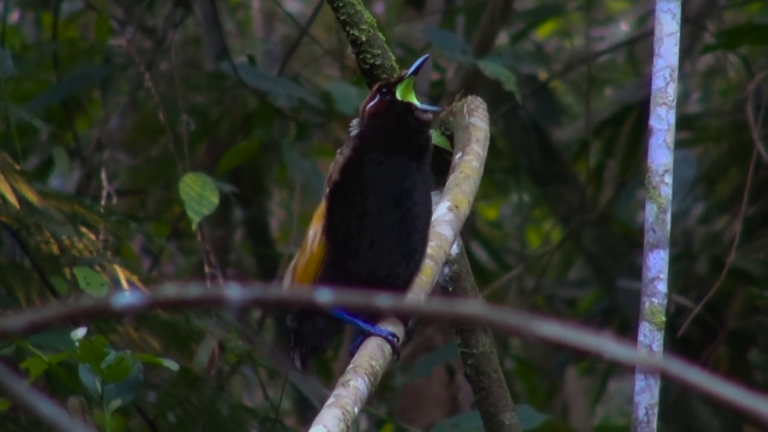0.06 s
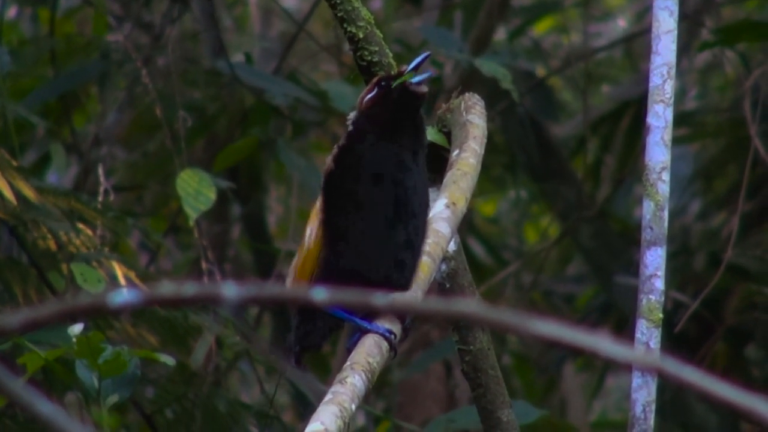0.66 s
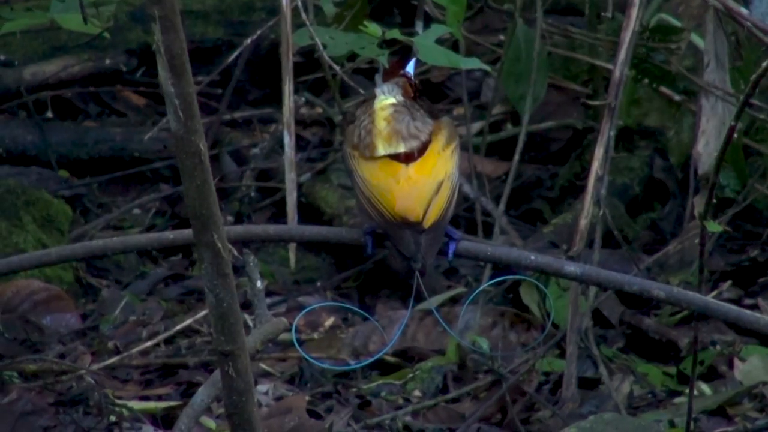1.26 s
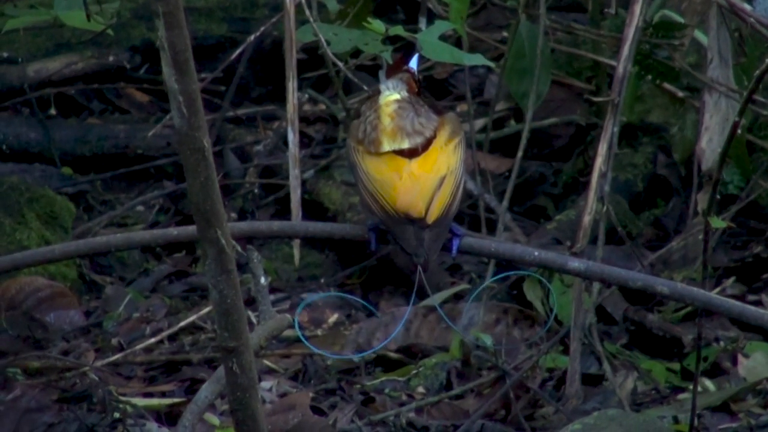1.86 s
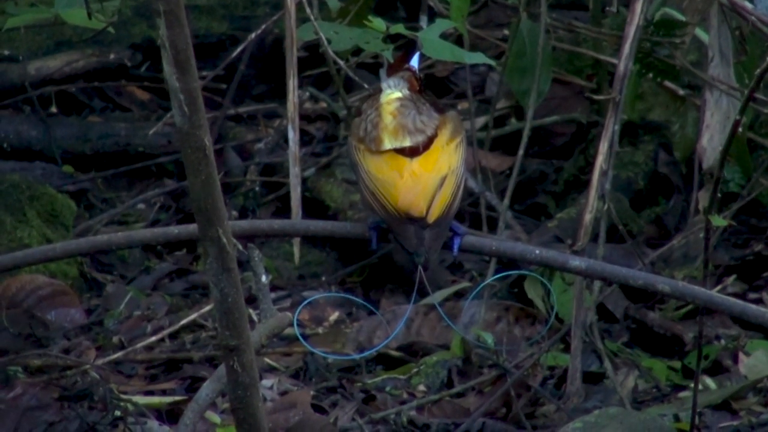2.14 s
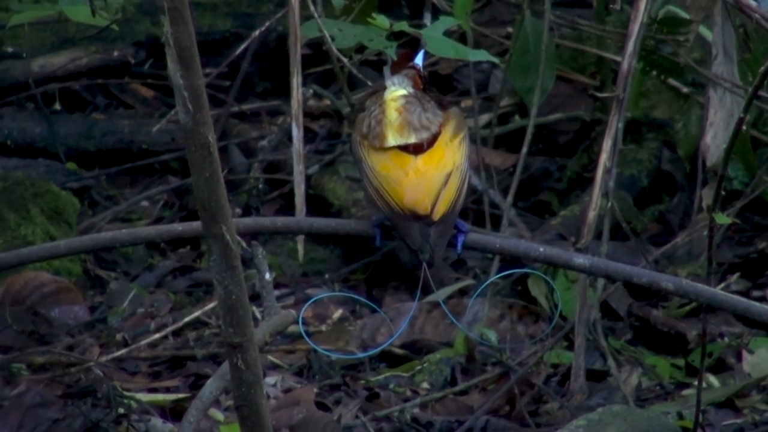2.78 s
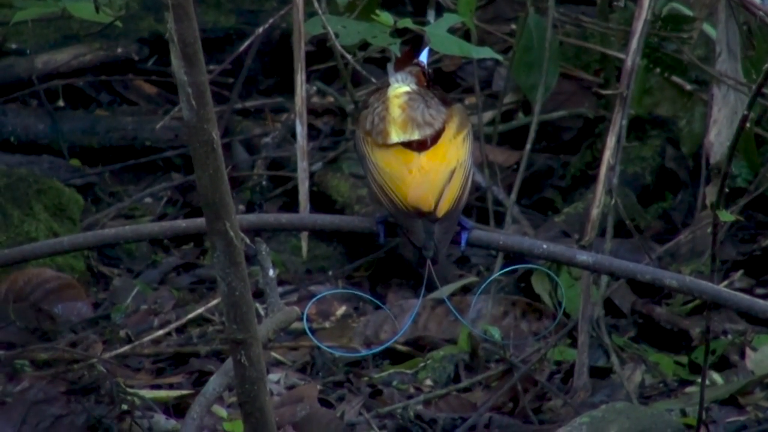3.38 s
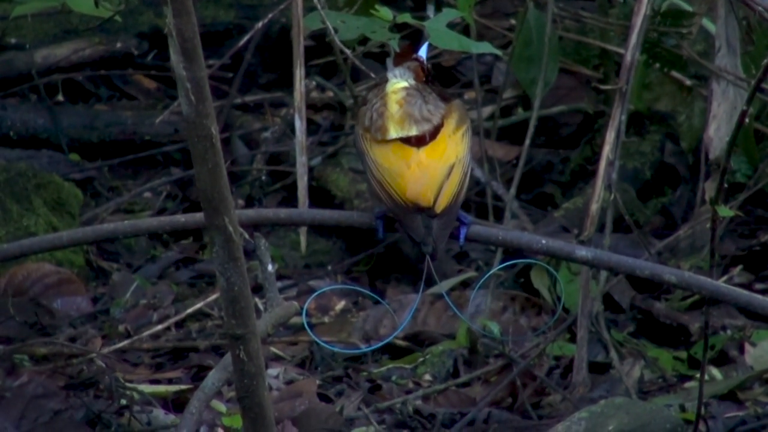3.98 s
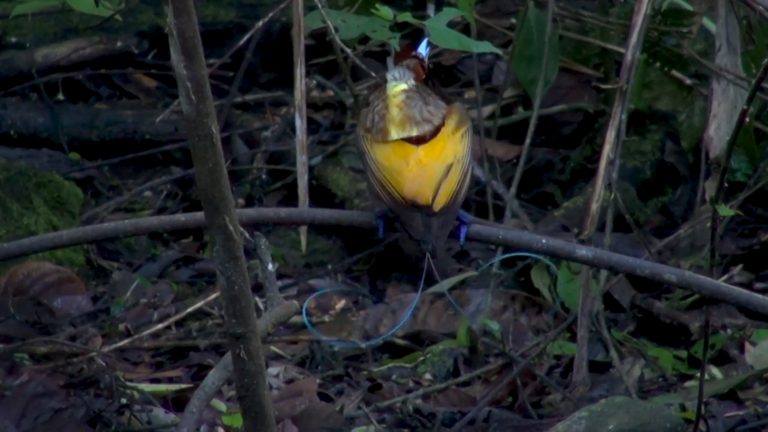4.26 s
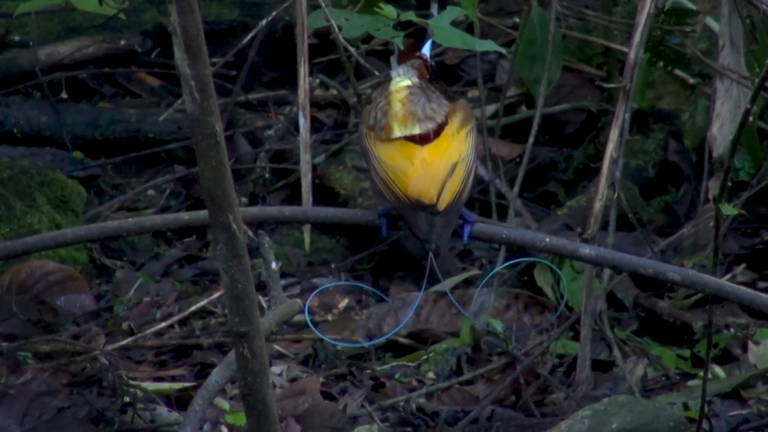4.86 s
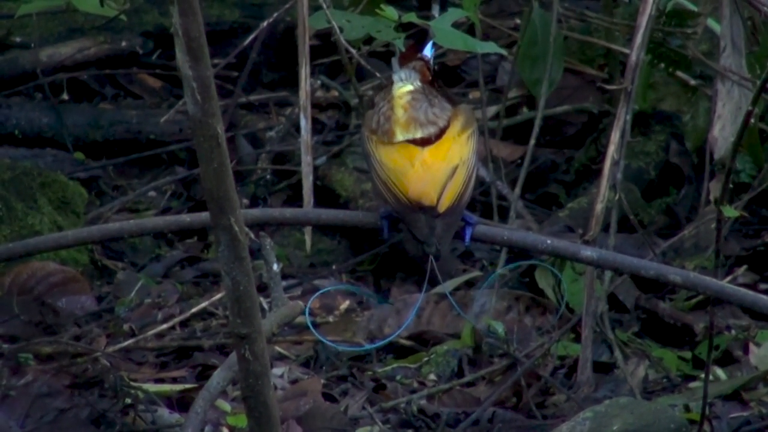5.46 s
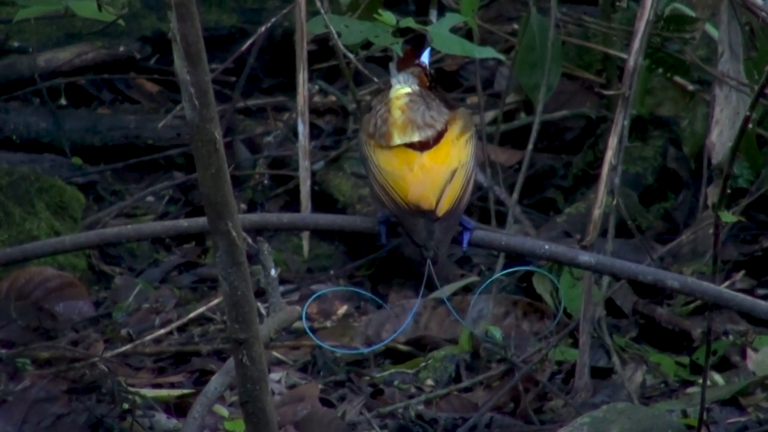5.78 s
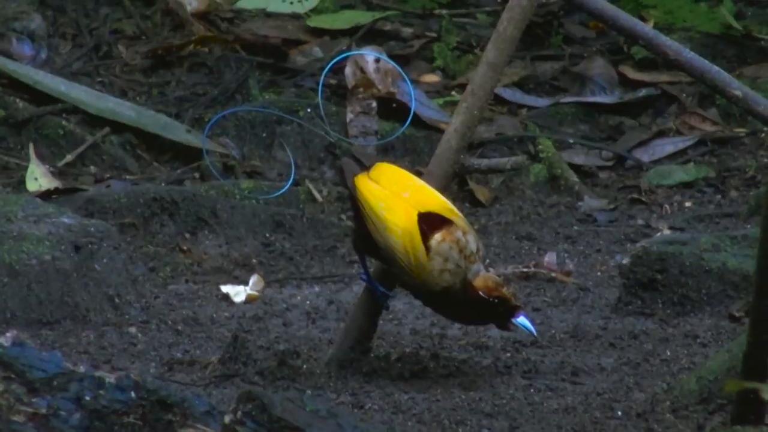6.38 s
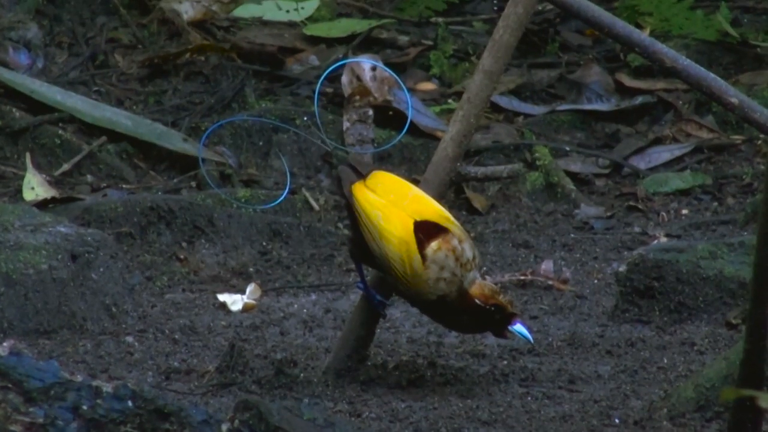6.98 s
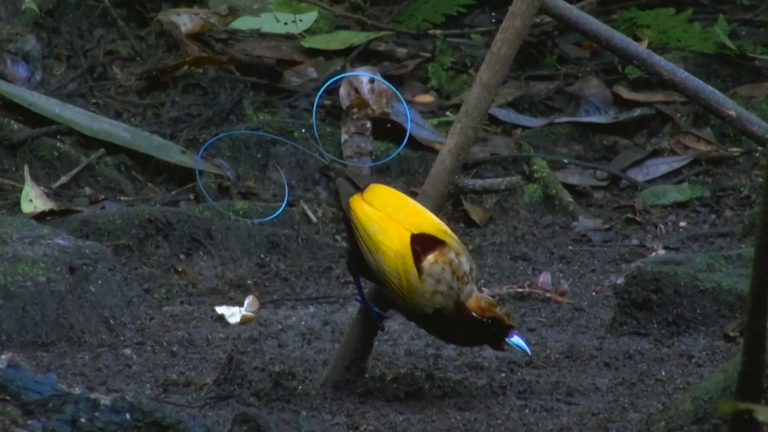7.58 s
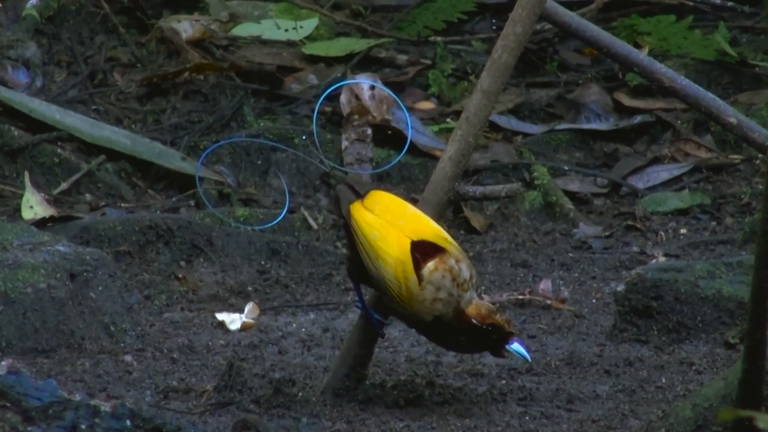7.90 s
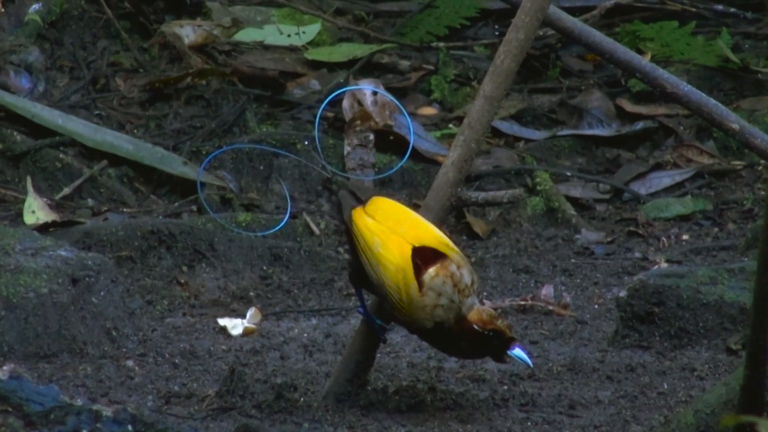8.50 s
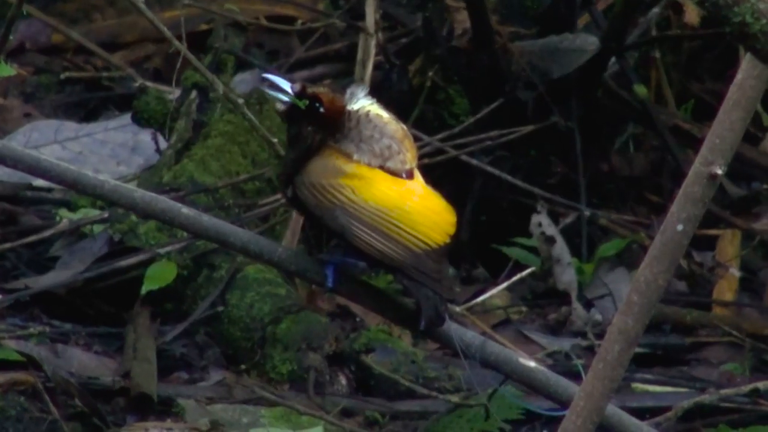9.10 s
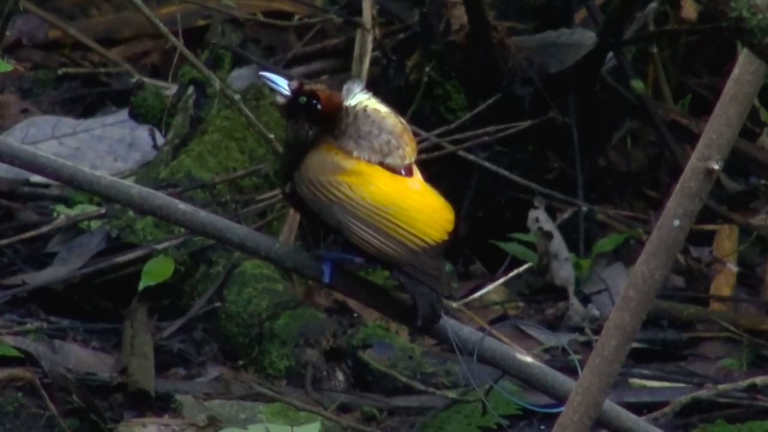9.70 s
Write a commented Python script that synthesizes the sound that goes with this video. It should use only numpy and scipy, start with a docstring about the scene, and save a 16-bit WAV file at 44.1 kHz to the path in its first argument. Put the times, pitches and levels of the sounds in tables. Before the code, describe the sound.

Raspy bird calls and then piercing downward notes echo among trees, with soft whining insects and a twig snapping.

```python
"""A bird of paradise calls in a rain forest: three harsh, warbling, falling churrs, which with their echo stop
dead on a click at 0.95 s, then five sharp down-slurred notes, each trailing a thin whistle into the echo of the
trees. Its syrinx makes a stack of harmonics and a rasp of air, which the throat and beak colour. Insects whine
near 4.7 kHz over a soft forest murmur; twigs snap and a far bird answers."""
import sys
import numpy as np
from scipy import signal
from scipy.fft import rfft, irfft, next_fast_len
from scipy.io import wavfile
from scipy.ndimage import map_coordinates

SR = 44100
rng = np.random.default_rng(int(sys.argv[2]) if len(sys.argv) > 2 else 0)


def waveform_to_disk(signal):
    """Save audio, clipped to [-1, 1], as 16-bit WAV at the path in sys.argv[1]."""
    frames = np.transpose(np.atleast_2d(signal))
    scaled = np.clip(frames, -1, 1) * 32767
    samples = np.round(scaled).astype(np.int16)
    wavfile.write(sys.argv[1], SR, samples)


N = 429534
T = np.arange(N) / SR
TOP_HZ = 15750

# The churr cues. Each row: start in seconds, level in dB.
CHURR_CUES = [(0.05, -19), (0.446, -19), (0.848, -18.5)]
# The throat's tone with the beak wide open, then settled. Each row: frequency in Hz, gain in dB.
OPEN_THROAT = [(850, -27.5), (1300, -23.5), (1700, 0), (2200, 0), (2750, -12), (3300, -31), (3900, -39),
               (5500, -42), (6600, -30), (8000, -33.5), (9200, -51.5), (10300, -49.5), (11800, -44.5),
               (13500, -58), (16000, -52)]
SETTLED_THROAT = [(700, -12.5), (1100, -26), (1450, 1.5), (1900, 0), (2350, -11), (2850, -33.5),
                  (3400, -40), (5200, -45), (6400, -33.5), (7400, -37), (8600, -53), (10000, -40.5),
                  (11200, -59.5), (13700, -45.5), (16000, -59.5)]
# Hoarse air in a churr. Each row: frequency in Hz, noise density in dB.
CHURR_AIR = [(1200, -37.5), (1650, -15), (2100, 5), (2600, -2), (3000, -11), (3450, -34.5), (6500, -26.5),
             (9000, -56.5)]
# Where the bright bite of a churr or sharp note sits. Each row: frequency in Hz, share of the bite.
BITE_SHARE = [(3500, 0.043), (5200, 0.69)]


def churrs(length=.256, first_hz=1153, last_hz=829.6, warble_hz=51, swing=.08, rough=.028, throb_db=2.5):
    """A sinking, throbbing rasp: alternate cycles differ only slightly, so even harmonics carry it."""
    attack_s, hold_s, release_s, settle_s = .028, .086, .023, .11
    out = np.zeros((2, N))
    air = rush(CHURR_AIR)[0]
    t = np.arange(int(length * SR)) / SR
    sink = (last_hz / first_hz) ** (t / length)
    throat_shift = (sink / sink.mean()) ** .6  # the resonances sink with the pitch
    gape = np.clip(1 - (t / settle_s) ** 2, 0, 1)
    throat = lambda hz: gape * along(OPEN_THROAT, hz) + (1 - gape) * along(SETTLED_THROAT, hz / throat_shift)
    bite = lambda hz: (4 - 44.5 * t) * along(BITE_SHARE, hz)  # starts bright, then dulls
    envelope = (1 - np.exp(-t / attack_s)) * amp(-58 * np.maximum(t - hold_s, 0))
    envelope *= np.clip((length - t) / release_s, 0, 1)
    for s, db in CHURR_CUES:
        warble = phase_of(warble_hz * (1 + .05 * wobble(40, len(t))))
        pitch = first_hz * sink * (1 + swing * np.cos(warble) + rough * wobble(700, len(t)))
        effort = envelope * amp(db - throb_db * np.sin(warble))  # loudest as the warble slides up
        tone = voice(pitch, lambda hz: throat(hz) + bite(hz), count=18, odd_db=-8.5)
        rasp = amp(-8 - 65 * t) * air[round(s * SR):][:len(t)]
        call = effort * (tone + rasp)
        echoed = among_trees(call, early_db=1.5, early_t60=.09, tail_db=-13.5, width_db=-20)
        place(out, s, echoed, pan_db=-.5)
    # the trees ring faintly in the band of the churr
    ringing = rush([(1200, -58.5), (1600, -4.5), (1900, -2.5), (2300, -8), (3200, -62)])
    return out + amp(-44 - 15 * T) * ringing


# The sharp note cues. Each row: start in seconds, first pitch and landing pitch in Hz, time to the peak
# and fall time in seconds, level in dB, length in seconds, beak resonance in Hz, bite in dB,
# gain of the odd harmonics in dB.
NOTE_CUES = [(1.548, 2392, 1279, 0.029, .02, -15.5, .29, 7100, 8, -7),
             (4.241, 2288, 1257, 0.028, .021, -15.5, .29, 7000, 8, -6.5),
             (5.445, 2143, 1262, 0.036, 0.015, -17, .3, 6550, 7.5, -6.5),
             (5.658, 1838, 1239, 0.027, .014, -21.5, .24, 5050, 0.5, -5.5),
             (8.99, 2246, 1265, 0.0227, .024, -15, .3, 5730, 8.5, -3.5)]
# The throat's tone in the burst, then in the held whistle. Each row: frequency in Hz, gain in dB.
BURST_THROAT = [(1100, -14.5), (1500, -10), (2100, -11), (2500, -3.5), (2900, -2), (3650, -8.5),
                (4100, -20), (5500, -34.5), (6500, -44), (8200, -37), (9200, -47), (10800, -47.5),
                (12600, -39.5), (16000, -52)]
HELD_THROAT = [(1200, -6), (2500, -3), (3800, -46), (5050, -21), (6300, -12), (7700, -23.5), (9000, -43),
               (16000, -64.5)]
# Hiss of air at the height of a note. Each row: frequency in Hz, noise density in dB.
NOTE_AIR = [(1200, -18), (3000, 3.5), (4500, 9), (6000, 0.5), (8200, 11), (9000, -16), (10800, -14),
            (12600, -16.5), (15700, -25)]


def sharp_notes(rise_s=.022, glide_s=.0225, sag=.11, rough=.018, dulling_db_per_s=240.5, whistle_db=-29):
    """The pitch plunges most of an octave and levels off; a thin whistle hangs on and sags at its end."""
    out = np.zeros((2, N))
    air = rush(NOTE_AIR)[0]
    for s, first_hz, landing_hz, peak_s, fall_s, db, length, beak_hz, bite_db, odd_db in NOTE_CUES:
        t = np.arange(int(length * SR)) / SR
        slope_s = np.where(t < peak_s, rise_s, fall_s)
        force = np.exp(-np.abs((t - peak_s) / slope_s) ** 1.244 / 2)
        pitch = landing_hz + (first_hz - landing_hz) * np.exp(-(t / glide_s) ** 1.3)
        pitch *= 1 - sag * (t / length) ** 3.6
        pitch *= 1 + rough * force * wobble(900, len(t))  # full force roughens the tone
        beak = lambda hz: 8 * np.exp(-((hz - beak_hz) / 900) ** 2)
        bite = lambda hz: (bite_db - dulling_db_per_s * t) * along(BITE_SHARE, hz)
        tone = voice(pitch, lambda hz: along(BURST_THROAT, hz) + beak(hz) + bite(hz), 11, odd_db)
        rasp = amp(-31) * force * air[round(s * SR):][:len(t)]
        burst = force * (tone + rasp)
        held = amp(whistle_db - 45 * t) * np.clip(t / peak_s - 1, 0, 1)
        dulling = lambda hz: 60 * t * (hz > 3500)  # the overtones fade first
        whistle = held * voice(pitch, lambda hz: along(HELD_THROAT, hz) + beak(hz) - dulling(hz), 7)
        call = amp(db) * gate(t, 0, length, .01275) * (burst + whistle)
        echoed = among_trees(call, early_db=-1, early_t60=.0924, tail_db=-9.5, width_db=-23)
        place(out, s, echoed, pan_db=1.6 if s > 7 else -.6)
    return out


def voice(pitch, throat_db, count, odd_db=0):
    """Harmonics of the syrinx, each weighted by the throat as it slides through."""
    k = np.arange(1, count + 1)[:, None]
    weights = amp(throat_db(k * pitch) + odd_db * (k % 2)) * (k * pitch < TOP_HZ)
    return np.sqrt(2) * np.sum(weights * np.sin(k * phase_of(pitch)), axis=0)


# The forest's reverb tail. Each row: frequency in Hz, seconds to fade by 60 dB.
TREE_DECAY = [(300, .5), (1400, 0.79), (2800, 0.91), (6000, 0.68), (13000, 0.22)]


def among_trees(call, early_db, early_t60, tail_db, width_db):
    """A call, its quick scatter off ground and near trunks, and the long forest echo; stereo."""
    hz, frame_s, bands = signal.stft(rng.standard_normal((2, SR)), SR, nperseg=256)
    decay = amp(-60 * frame_s / along(TREE_DECAY, hz)[:, None])
    t = np.arange(SR) / SR
    tail = signal.istft(bands * decay, SR, nperseg=256)[1][:, :SR] * np.clip(t / .0067, 0, 1)
    trunks = rng.standard_normal((2, SR)) * (rng.random((2, SR)) < 500 / SR) * amp(-60 * t / early_t60)
    early = amp(early_db) * trunks / np.linalg.norm(trunks[0])
    mid, side = early + amp(tail_db) * tail / np.linalg.norm(tail[0])
    mid[0] += 1  # the direct sound
    side *= amp(width_db)
    return signal.fftconvolve(call[None], np.array([mid + side, mid - side]), axes=1)


# Twigs and dry leaves. Each row: start in seconds, level in dB, seconds to fade by 60 dB.
SNAP_CUES = [(3.913, -47.5, 0.09), (4.3742, -30.5, 0.077), (8.909, -56.5, 0.046), (9.472, -44, 0.018),
             (9.597, -57.5, 0.022)]
# The colour of a snap. Each row: frequency in Hz, noise density in dB.
SNAP_COLOUR = [(150, -32), (700, -10.5), (1150, -0.5), (2000, -1.5), (4000, -2.5), (8000, -14),
               (15000, -20)]


def twigs():
    """Each snap is a quickly dying burst of splintering."""
    force = np.zeros(N)
    t = np.arange(SR // 4) / SR
    for s, db, t60 in SNAP_CUES:
        add(force, s, amp(db - 60 * t / t60) * (1 - np.exp(-t / .001)))
    return force * unit(rush(SNAP_COLOUR).mean(axis=0) * amp(3 * wobble(1500)))


# The answering bird. Each row: start and length in seconds, first and last pitch in Hz, level in dB.
ANSWER_CUES = [(1.326, 0.075, 1947, 1655, -56.5), (2.744, 0.061, 1960, 1810, -54),
               (4.566, .07, 2070, 1710, -54)]


def far_bird():
    """Faint, short downward slurs with two overtones."""
    out = np.zeros((2, N))
    throat = lambda hz: along([(1800, -4), (2700, 7.5), (3600, -10), (5400, -13), (8000, -20)], hz)
    for s, length, first_hz, last_hz, db in ANSWER_CUES:
        t = np.arange(int(length * SR)) / SR
        pitch = last_hz + (first_hz - last_hz) * (1 - t / length) ** 1.75
        call = amp(db) * gate(t, 0, length, .015) * voice(pitch, throat, count=3)
        echoed = among_trees(call, early_db=-1.5, early_t60=.073, tail_db=-10.5, width_db=-27)
        place(out, s, echoed, pan_db=1)
    return out


# Faint tones. Each row: start and length in seconds, pitch in Hz, level in dB, waver as a share of pitch.
TONE_CUES = [(1.217, .34, 2705, -64, 0.0072), (1.75, 0.8, 2560, -68.5, 0.0296),
             (2.871, .3, 2680, -63.5, .08), (7.48, 0.29, 2900, -72, 0.0029)]


def faint_tones():
    """Faint thin tones, and at 2.9 s a blurred, echo-like ring near 2.7 kHz."""
    out = np.zeros(N)
    for s, length, hz, db, waver in TONE_CUES:
        t = np.arange(int(length * SR)) / SR
        pitch = hz * (1 + waver * wobble(300, len(t)))
        level = amp(db + 4.2 * wobble(17, len(t))) * gate(t, 0, length, .049)
        add(out, s, level * np.sin(phase_of(pitch)))
    return out


# Near insects. Each row: start and length in seconds, pitch in Hz, level in dB, swell in dB per second.
INSECT_BOUTS = [(.93, .7, 4720, -56, -7), (2.579, 1.5, 4646, -60.5, -2), (3.655, 0.92, 4790, -59.5, -9.5),
                (5.193, 1.15, 4647, -59.5, 1), (6.298, 1.1, 4720, -61, -5.5),
                (7.741, 2.1, 4647, -59.5, 1.5)]
# One insect's whine. Each row: ratio to its pitch, noise density in dB.
WHINE_COLOUR = [(.85, -53.5), (.93, -23.5), (.975, -11), (1, -1), (1.025, -12), (1.08, -22), (1.25, -44.5)]
# The far chorus. Each row: frequency in Hz, noise density in dB.
CHORUS_COLOUR = [(3900, -36), (4350, -5), (4650, 0.5), (4900, -2.5), (5200, -11), (5900, -31)]


def insects(throb_hz=51.4, throb_db=2.5):
    """A far chorus blurs into one band; near singers join in bouts. All throb together."""
    chorus_db = bed_levels()[-1]
    out = amp(chorus_db) * rush(CHORUS_COLOUR)
    for s, length, hz, db, swell in INSECT_BOUTS:
        level = amp(db + swell * np.clip(T - s, 0, length)) * gate(T, s, s + length, .07)
        out += level * rush([(hz * ratio, gain) for ratio, gain in WHINE_COLOUR])
    throb = np.sin(phase_of(throb_hz * (1 + .02 * wobble(22))))
    return out * unit(amp(throb_db * throb))


# The forest bed's low, middle and high layers. Each row: frequency in Hz, noise density in dB.
RUMBLE_COLOUR = [(20, -22), (40, -10), (66, 0), (110, -1.5), (170, -5), (300, -23), (600, -45)]
MURMUR_COLOUR = [(100, -18.5), (200, -3), (370, 0), (560, -4), (730, -5), (870, -5.5), (1090, -10),
                 (1400, -10), (1900, -14.5), (2500, -19.5), (3500, -45.5)]
LEAF_COLOUR = [(900, -13), (1800, 4.5), (3000, 4), (4000, 1.5), (5600, 4.5), (8000, 3), (10000, 0),
               (13000, -1), (15700, -3.5)]


def forest(flutter_hz=13):
    """Rumble, murmur, leaf hiss and a faint narrow drone, all drifting; for a second the hiss flutters."""
    rumble_db, murmur_db, hiss_db, _ = bed_levels()
    rumble = amp(rumble_db + 1.3 * wobble(4.5)) * rush(RUMBLE_COLOUR)
    murmur = amp(murmur_db + .71 * wobble(5.5)) * rush(MURMUR_COLOUR) * amp([[-.7], [.7]])  # leans right
    hiss = amp(hiss_db + .4 * wobble(8.4)) * rush(LEAF_COLOUR)
    drone_level = amp(murmur_db - 13 + 1.5 * wobble(2.6))
    drone = drone_level * rush([(1080, -53), (1145, -14.5), (1170, 3), (1200, -3.5), (1280, -57.5)])
    beat = np.sin(phase_of(flutter_hz * (1 + .17 * wobble(6.2))))
    flutter_level = amp(-63.5 + 4.2 * beat) * gate(T, 7.74, 8.76, .021)
    flutter = flutter_level * rush([(700, -16), (2200, .5), (3800, 0), (7000, -9.5), (11000, -27)])
    return rumble + murmur + hiss + drone + flutter


# The bed's mix. Each row: start in seconds, then rumble, murmur, leaf hiss and insect chorus in dB.
BED_STEPS = [(0, -71, -62.5, -64, -69.5), (.946, -64.5, -57.5, -62, -62.5), (2.82, -65, -57, -60.5, -62.5),
             (5.2, -63.8, -56, -59, -63), (6.1, -67, -58, -63.5, -66), (7.74, -66, -58, -62.5, -66.5),
             (8.76, -66.5, -56, -61.5, -61)]


def bed_levels():
    """The four background levels in dB for every sample, each held until the next step."""
    starts, *levels = np.transpose(BED_STEPS)
    step = np.maximum(np.searchsorted(starts, T, side="right") - 1, 0)
    return [db[step] for db in levels]


# The stereo image of the noise. Each row: frequency in Hz, left-right likeness (1 is mono).
EAR_LIKENESS = [(30, 0.88), (120, 0.5), (300, 0.55), (900, 0.61), (4700, 0.98), (8000, 0.31), (11000, 0.92)]


def rush(colour):
    """Stereo noise of rms 1 with the given colour, partly alike in both ears."""
    def response(hz):
        spread = np.arccos(np.clip(along(EAR_LIKENESS, hz), -1, 1)) / 2
        return amp(along(colour, hz)) * [np.cos(spread), np.sin(spread)]
    mid, side = filtered(rng.standard_normal((2, N)), response)
    return unit(np.array([mid + side, mid - side]))


def amp(db):
    """Decibels to gain."""
    return 10 ** (np.asarray(db) / 20)


def unit(x):
    """Scale to rms 1."""
    return x / np.sqrt(np.mean(x ** 2) + 1e-20)


def along(points, hz):
    """(Hz, value) points read on a log axis."""
    freqs, values = np.transpose(points)
    return np.interp(np.log(hz + 1), np.log(freqs + 1), values)


def phase_of(hz):
    """Running phase in radians of a moving frequency."""
    return 2 * np.pi * np.cumsum(hz) / SR


def wobble(rate, size=N):
    """A smooth random curve, rate knots a second."""
    knots = rng.standard_normal(int(size * rate / SR) + 4)
    return map_coordinates(knots, [np.arange(size) * rate / SR])


def gate(t, start, end, edge):
    """1 between start and end, with sloping edges."""
    return np.clip(np.minimum(t - start, end - t) / edge, 0, 1)


def add(track, s, sound):
    """Mix a sound into a track at time s."""
    part = track[round(s * SR):][:len(sound)]
    part += sound[:len(part)]


def place(track, s, sound, pan_db):
    """Mix a stereo sound in at time s, leaning left by pan_db."""
    add(track[0], s, sound[0] * amp(pan_db / 2))
    add(track[1], s, sound[1] * amp(-pan_db / 2))


def filtered(x, response):
    """Shape x with a gain that depends on frequency."""
    size = next_fast_len(N + 8192)
    return irfft(rfft(x, size) * response(np.fft.rfftfreq(size, 1 / SR)), size)[..., :N]


def scene(break_s=.9462):
    """At 0.95 s the churrs and their echo stop dead and a click sounds; the echo of the paired notes also ends
    early."""
    before_break = np.clip((break_s - T) / .0004, 0, 1)
    click = amp(-14) * (T > break_s) * np.exp(-np.abs(T - break_s) / .0001)
    lull = gate(T, 6.1, 8.9, .01)
    bird = churrs() * before_break + sharp_notes() * (1 - lull)
    return bird + click + far_bird() + faint_tones() + twigs() + forest() + insects()


def record(dry):
    """A hard low-pass takes off the very top."""
    return filtered(dry, lambda hz: hz < TOP_HZ)


dry = scene()
out = record(dry)
waveform_to_disk(out)
```